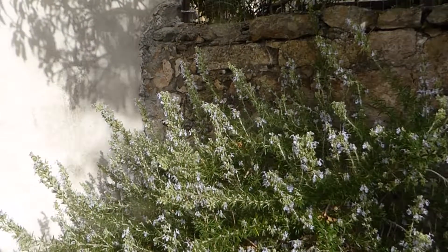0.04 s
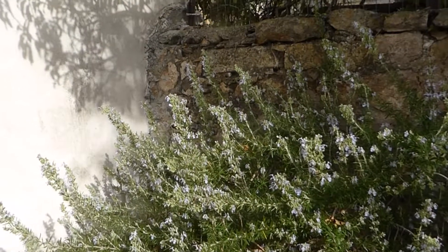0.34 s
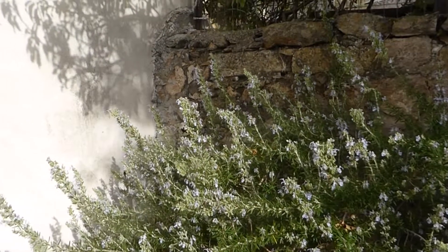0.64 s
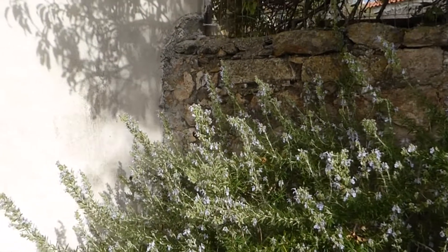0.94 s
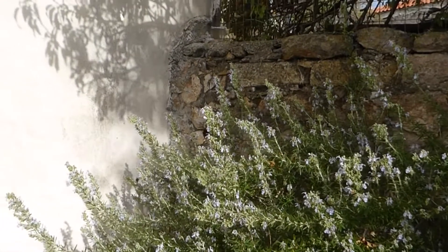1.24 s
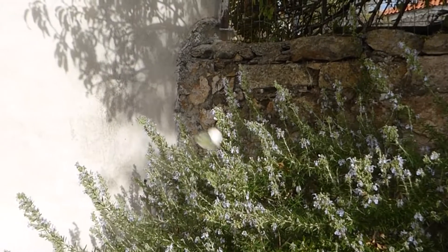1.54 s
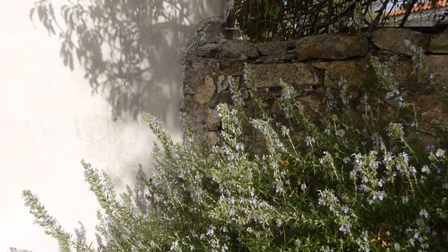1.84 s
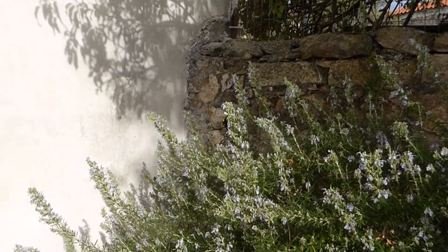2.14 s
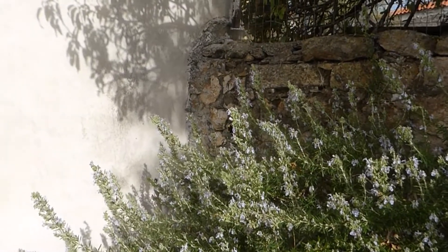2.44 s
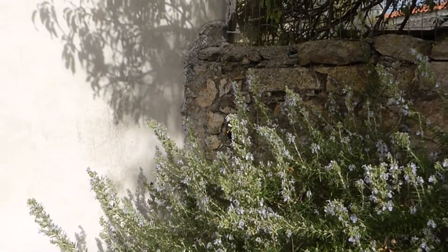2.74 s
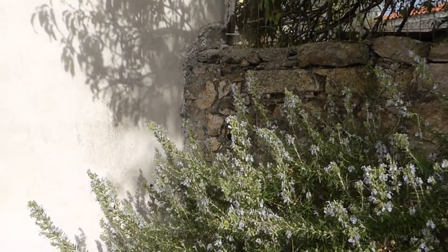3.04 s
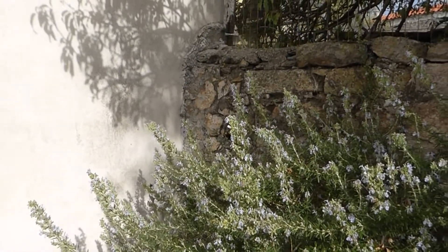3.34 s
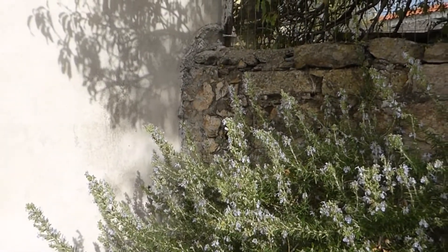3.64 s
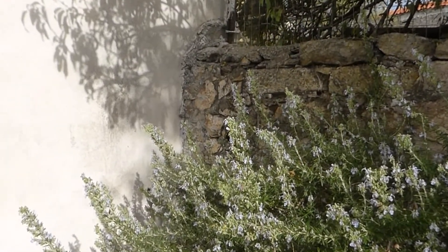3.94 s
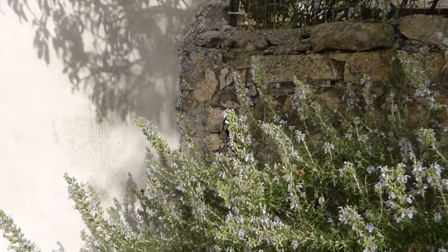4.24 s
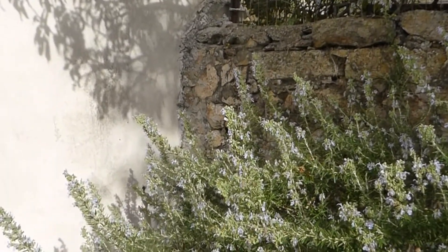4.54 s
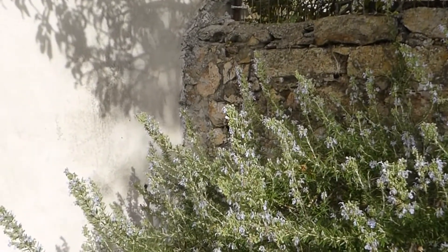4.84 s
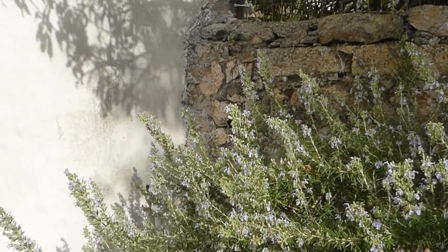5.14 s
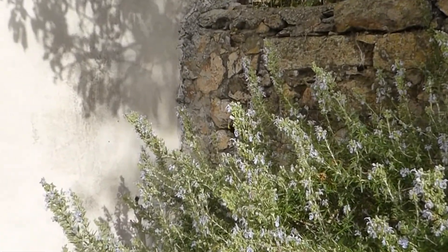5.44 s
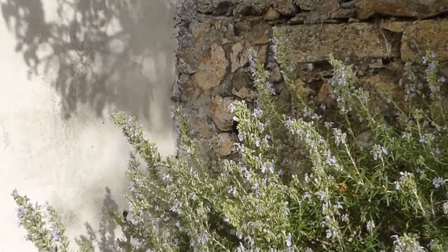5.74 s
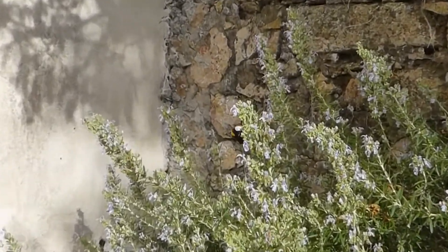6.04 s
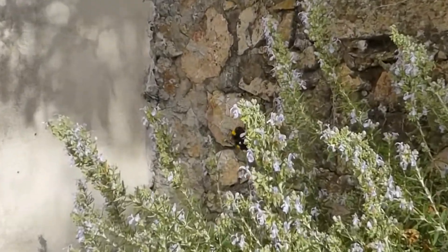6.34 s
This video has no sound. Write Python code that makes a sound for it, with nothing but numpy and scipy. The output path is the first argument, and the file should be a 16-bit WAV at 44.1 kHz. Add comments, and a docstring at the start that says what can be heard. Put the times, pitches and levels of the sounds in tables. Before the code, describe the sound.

Close to a bush in a quiet garden, several bees buzz with a wavering pitch above a swarm, soft hiss and low rumble. A distant bird whistles faintly a few times. Taps and rubs on the camera come in right beside the microphone, followed by a high, gritty zoom whirr and a single sharp snap of the housing. After a short pause the zoom whirrs again as the hand lightly bumps the body.

```python
"""A garden, at a flowering bush by a stone wall: honeybees hum on wavering wingbeats, three close by
and a swarm behind, over soft air, rumble, hiss and a few faint bird whistles.
Fingers tick, rub and bump on a hand-held camera with two microphone ports. Its zoom motor whirrs twice,
the gears shaking the lens barrel, and the first run is broken by one sharp snap of the housing."""
import sys
import numpy as np
from scipy import signal
from scipy.fft import rfft, irfft, next_fast_len
from scipy.io import wavfile

SR = 44100
rng = np.random.default_rng(int(sys.argv[2]) if len(sys.argv) > 2 else 0)


def wav_out(sig):
    """Save sig, one row per channel (or a flat mono array), as 16-bit PCM at SR to the path in sys.argv[1]."""
    wavfile.write(sys.argv[1], SR, np.round(np.clip(np.atleast_2d(sig).T, -1, 1) * 32767).astype(np.int16))


N = 282681
TIME = np.arange(N) / SR


# flight paths of the nearest, a side-on and a heavier bee: t/s, wingbeat f/Hz, relative level/dB
NEAR_PATH = [(0.0, 225.8, -65), (0.15, 236.2, -68), (0.4, 243, -72), (0.7, 232.8, -61.5),
             (0.96, 237.6, -68), (1.08, 227.5, -59.5), (1.42, 216.1, -62.5), (1.72, 228.6, -59),
             (1.85, 224.2, -60), (2.0, 226, -61), (2.22, 229, -61.5), (2.55, 223.4, -61),
             (2.75, 212.7, -58), (2.95, 209.2, -58.5), (3.14, 215.2, -55.5), (3.38, 224.2, -61),
             (3.52, 211.3, -60.5), (3.7, 222, -60), (3.92, 213.5, -58), (4.13, 215, -57.5),
             (4.3, 214.6, -66), (4.5, 218.2, -62), (4.9, 224.2, -64.5), (5.57, 231, -62.5),
             (5.85, 214.2, -68), (6.08, 222, -59), (6.32, 233, -61), (6.41, 224.5, -67)]
SIDE_PATH = [(0.0, 223.4, -78), (0.3, 223.7, -73), (0.5, 214.6, -62.5), (0.7, 228, -66), (0.9, 222.9, -69),
             (1.15, 213.9, -65), (1.5, 219.1, -67), (1.85, 226.1, -58), (2.1, 222.3, -76),
             (2.33, 226.4, -56), (2.55, 214.8, -70), (3.3, 214.5, -69), (4.6, 212, -69), (6.41, 218.2, -73)]
HEAVY_PATH = [(0.0, 185, -73.5), (0.4, 190, -77), (0.8, 189.2, -73), (1.1, 184, -69), (1.3, 188, -69),
              (1.58, 195, -67), (1.9, 194, -67.5), (2.3, 188, -72), (3.2, 198, -77), (6.41, 190, -90)]
# their wing timbres, the first shared with the swarm: f/Hz, harmonic level/dB
WING_TONE = [(200, -7), (450, -1.5), (680, -10.5), (900, -17.5), (1150, -13), (1400, -10.5), (2000, -31),
             (3500, -14)]
SIDE_TONE = [(220, -12), (440, -7), (660, -3), (880, -12), (1350, -18)]
HEAVY_TONE = [(190, -4.5), (380, 2), (580, -10)]
def close_bees():
    """Three bees stand out of the swarm, weaving in pitch."""
    return (flight(NEAR_PATH, WING_TONE, gain_db=-6, turning_db=1, lag_s=0.00009, harmonics=8)
            + flight(SIDE_PATH, SIDE_TONE, gain_db=-6, turning_db=2.5, lag_s=0.00015, harmonics=6)
            + flight(HEAVY_PATH, HEAVY_TONE, gain_db=-2, turning_db=2.5, lag_s=-0.00021, harmonics=3))


def flight(path, tone, gain_db, turning_db, lag_s, harmonics):
    """One bee among the flowers: its wingbeat trembles, and it swells and fades as it turns."""
    wing_hz, level_db = in_time(path)
    tremble = 1 + .008 * drift(14) + .018 * drift(60)
    level = from_db(level_db + gain_db + turning_db * drift(2.6))
    return level * wingbeat(wing_hz * tremble, tone, lag_s, harmonics, flutter_db=3)


def wingbeat(wing_hz, tone, lag_s, harmonics, flutter_db):
    """Beating wings: each harmonic flutters on its own, and the buzz reaches one port first."""
    mean_hz, out = wing_hz.mean(), np.zeros((2, N), np.float32)
    port_phase = np.pi * mean_hz * lag_s * np.array([[1], [-1]])
    phase = (phase_of(wing_hz) + port_phase).astype(np.float32)
    for k in range(1, harmonics + 1):
        level = from_db(at_hz(tone, k * mean_hz) + flutter_db * drift(7.8)).astype(np.float32)
        out += level * np.sin(k * phase + np.float32(rng.uniform(0, 2 * np.pi)))
    return np.sqrt(2) * out


def swarm(wander=.03, tremble=0.012, presence_db=4, slow_hz=204, fast_hz=242, bees=7):
    """Other bees come and go, each on an unsteady wingbeat of its own."""
    out = 0
    for k, hz in enumerate(np.linspace(slow_hz, fast_hz, bees)):
        wing_hz = hz * (1 + wander * drift(1.8) + tremble * drift(15.3))
        presence = from_db(presence_db * np.minimum(drift(2.8), 1))
        lag_s = 0.00052 * np.cos(2 * k)
        out = out + presence * wingbeat(wing_hz, WING_TONE, lag_s, harmonics=7, flutter_db=1.5)
    return rms_one(out)


# envelopes of the two zoom runs: t/s, level/dB
FIRST_ZOOM = [(3.52, -62), (3.58, -54.5), (3.66, -52.5), (3.85, -51.5), (4.14, -51), (4.21, -62),
              (4.335, -53.5)]
SECOND_ZOOM = [(5.306, -52), (5.335, -44.5), (5.37, -49), (5.40, -51.5), (5.8, -52), (6.1, -53),
               (6.41, -54)]
# lens barrel resonances: f/Hz, width/Hz, relative level/dB, relative throb/dB, pan/dB, racing gain/dB
BARREL_MODES = [(908, 88, -11, -2, -10.5, -2), (1320, 150, -22, -8, -7, 0), (1545, 470, 2, 4, -2, 1),
                (2730, 310, -8, 1.5, 0, 4), (3240, 540, -1, 0, -2, -4), (3660, 340, 0.5, 0, -3, -10),
                (3930, 480, 1, -1, 1, -7), (4550, 427, -2, 7, 1, 1), (5540, 563, -2, 5, 0, 4),
                (6624, 1250, -4, 4.5, -2.5, 2.5), (9600, 2500, -3.5, 1, 1, 0.5),
                (11100, 1715, -1, 3.5, -2, -2), (13200, 1100, -20, 8, -1, 0), (14000, 600, -13, 3, 0, -1)]
def zoom(run, throb, tooth_db, teeth=6):
    """The gears rub hardest once a turn and tick on every tooth, shaking the lens barrel."""
    gate = during(run, fade_s=0.0019)
    on, whirr, out = gate > 0, 0, np.zeros((2, N))
    level_db, = in_time(run)
    angle = gear_angle()[on]
    rub = np.tanh(2 * (np.cos(angle) - .3)) / 2
    ticking = from_db(tooth_db * np.cos(teeth * angle))
    speed, = in_time(GEAR_RATE)
    racing = ((speed - speed.min()) / np.ptp(speed))[on]
    for hz, width_hz, mode_db, throb_db, pan_db, race_db in BARREL_MODES:
        white = rng.standard_normal((2, 2 * SR))[:, :len(angle)]
        grit = ports(*white, at_hz(PORT_LIKENESS, hz))
        force = grit * ticking * from_db(throb * throb_db * rub)
        resonance = rms_one(band(force, hz, width_hz))
        whirr = whirr + from_db(mode_db + race_db * racing) * pan(pan_db) * resonance
    out[:, on] = rms_one(whirr) * gate[on] * from_db(level_db[on])
    return out


# gear speed, racing briefly as the second run starts: t/s, turning rate/Hz
GEAR_RATE = [(4.34, 36.1), (5.30, 36.4), (5.31, 58), (5.37, 54), (5.40, 36.4)]
def gear_angle(throb_peak_s=5.609):
    """Angle of the gear, zero where it rubs hardest."""
    angle = phase_of(in_time(GEAR_RATE)[0])
    return angle - np.interp(throb_peak_s, TIME, angle)


# singing gears: t/s, length/s, fade/s, f/Hz, level/dB, throb/dB, pitch roughness/fraction
GEAR_NOTES = [(1.665, 0.044, .015, 3540, -72, 0, .005), (2.03, 0.065, .015, 3530, -70, 0, 0.0051),
              (3.826, .15, .02, 3660, -63.5, 4, 0.0082), (3.98, 0.2, 0.025, 3612, -62, 1, 0.0057),
              (4.19, .145, .02, 3680, -71, 0, 0.0099), (4.178, 0.014, .002, 5920, -46, -3, .005),
              (4.305, 0.016, 0.0071, 4900, -52.5, 0, .015), (5.39, 1.05, 0.047, 3600, -61, 5.5, 0.0132),
              (5.34, 1.076, .05, 5548, -66, 5.5, 0.0138)]
def gear_whine(flicker_db=2, pan_db=-5):
    """The lens gears sing now and then in wavering tones, some throbbing once a turn."""
    out = np.zeros(N)
    waver = drift(170) + .4 * drift(20)
    throb = np.cos(gear_angle())
    for start, length, fade, hz, db, throb_db, rough in GEAR_NOTES:
        gate = np.clip(np.minimum(TIME - start, start + length - TIME) / fade, 0, 1)
        on = gate > 0
        tone = np.sin(phase_of(hz * (1 + rough * waver[on])))
        out[on] += from_db(db + throb_db * throb[on]) * gate[on] * tone
    return np.sqrt(2) * out * from_db(flicker_db * drift(74)) * pan(pan_db)


# the motor's high whine in each run: t/s, f/Hz, level/dB
FIRST_WHINE = [(3.6, 4780, -73), (3.67, 4835, -64), (3.75, 4770, -71), (3.81, 4727, -66), (3.9, 4730, -76),
               (3.95, 4820, -67), (4.02, 4820, -64), (4.06, 4744, -73), (4.1, 4750, -63.5),
               (4.16, 4867, -66)]
SECOND_WHINE = [(5.85, 4800, -73), (6.05, 4800, -68), (6.114, 4810, -61), (6.16, 4670, -61),
                (6.264, 4870, -58), (6.33, 4790, -62), (6.41, 4760, -61)]
def motor_whine(path, rough, flicker_db=3.5, pan_db=-2):
    """A thin tone that sags and recovers with the load on the motor."""
    hz, level_db = in_time(path)
    tone = np.sqrt(2) * np.sin(phase_of(hz * (1 + rough * drift(168))))
    return tone * during(path, fade_s=.01) * from_db(level_db + flicker_db * drift(60)) * pan(pan_db)


# catches of the lens drive: t/s, level/dB
LENS_CATCHES = [(3.717, -49), (4.689, -53.5), (5.312, -47)]
def lens_ticks(hz=3570, width_hz=500, half_length_s=0.0052, pan_db=-2,
               creep_start_s=5.092, step_s=0.0256, creep_db=-61, steps=9):
    """The drive catches, and creeps before the second run: each tick is a short rasp in the barrel."""
    creep = [(creep_start_s + k * step_s, creep_db) for k in range(steps)]
    force = sum(from_db(db) * np.exp(-np.minimum(((TIME - s) / half_length_s) ** 2, 50))
                for s, db in LENS_CATCHES + creep)
    grit = ports(*rng.standard_normal((2, N)), at_hz(PORT_LIKENESS, hz))
    return force * rms_one(band(grit, hz, width_hz)) * pan(pan_db)


# slips of a straining catch: t/s, level/dB, attack/s, decay/s
SNAP_SLIPS = [(4.160, -33, .0005, .001), (4.162, -21.5, 0.0003, 0.0005), (4.1698, -20, 0.0004, 0.0007),
              (4.1713, -10, 0.0002, 0.0005), (4.1721, -10.5, 0.0003, 0.0008), (4.171, -31, 0.007, 0.005)]
# colour of the crack: f/Hz, level/dB
CRACK_COLOUR = [(30, -20), (80, -26), (300, -11.5), (550, -11), (900, -6.5), (1400, -3.5), (2100, -10),
                (3500, -7), (5000, 7), (6400, 3.5), (8500, 1), (10500, 2), (11700, -4), (15000, -4.5),
                (16500, -15)]
# ring of the housing: f/Hz, level/dB, t60/s
HOUSING_MODES = [(220, -43, 0.025), (420, -40, 0.018), (740, -34, 0.025), (1320, -23, 0.018),
                 (1765, -20, 0.038), (2700, -26, 0.02), (3210, -22, 0.028), (3740, -21, 0.036),
                 (4010, -24, 0.045), (4890, -13.5, 0.014), (5590, -22, .018), (6080, -15, 0.012),
                 (6400, -17, 0.012), (7135, -19, 0.018), (7700, -25, 0.02), (8235, -25, .02),
                 (10440, -17, 0.008)]
# stereo image of the snap: f/Hz, pan/dB
SNAP_BALANCE = [(500, -1), (1760, -1), (2700, -7), (3210, 6), (3730, 5), (4300, -8), (4900, -1),
                (6400, -11), (8500, -8), (9500, -3), (12500, 3), (15000, -6)]
def snap(release_s=4.1712, rise_s=0.0011, left_lag_s=0.000295):
    """A catch slips hard and lets go; the housing rings, its treble mostly at the right port."""
    on, out = abs(TIME - release_s) < .1, np.zeros((2, N))
    t = TIME[on]
    force = sum(from_db(db) * np.exp(-np.maximum((s - t) / attack, (t - s) / decay))
                for s, db, attack, decay in SNAP_SLIPS)
    grit = noise(CRACK_COLOUR)
    grit[0] = np.interp(TIME - left_lag_s, TIME, grit[0])
    age = np.maximum(t - release_s, 0)
    port_phase = np.array([[np.pi / 2], [0]])   # the ring is a quarter cycle late on the left
    ring = sum((-1) ** k * from_db(db - 60 * age / t60) * np.sin(2 * np.pi * hz * age - port_phase)
               for k, (hz, db, t60) in enumerate(HOUSING_MODES))
    spectrum = rfft(force * grit[:, on] + (1 - np.exp(-age / rise_s)) * ring)
    pan_db = at_hz(SNAP_BALANCE, np.arange(spectrum.shape[1]) * SR / len(t))
    out[:, on] = irfft(spectrum * from_db(np.array([pan_db, -pan_db]) / 2), len(t))
    return out


# finger taps on the casing: t/s, scratch level/dB, thud level/dB, hold/s
FINGER_TAPS = [(2.825, -48.5, -46, 0.0021), (2.906, -52, -72, 0.0037), (3.019, -44, -50, 0.0028),
               (3.2017, -43.5, -42, 0.0029), (3.398, -51, -43, .0024), (3.415, -53.5, -43.5, 0.0019),
               (3.818, -46.5, -67, 0.0017), (4.4697, -70, -45, .0008), (4.547, -54.5, -56, .005),
               (4.589, -71, -45.5, .0012), (4.688, -51, -67, .003), (4.772, -45, -50, 0.0034),
               (5.7975, -44, -69, .003)]
# finger rubs and, at 4.173 s, the short, dull rattle that trails the snap: t/s, hold/s, scratch level/dB
RUBS_AND_RATTLE = [(1.426, 0.0091, -59.5), (2.837, 0.02, -55.5), (3.055, 0.014, -48), (3.209, 0.01, -55),
                   (3.417, 0.071, -58.5), (4.173, 0.015, -41), (4.533, 0.0062, -56.5),
                   (4.706, 0.032, -56.5), (4.779, 0.079, -55)]
# colours of the scratch and the thud: f/Hz, level/dB
SCRATCH_COLOUR = [(200, -28), (900, -17), (1600, 3), (2300, -10.5), (3500, 2.5), (5000, -0.5), (6400, -2),
                  (8500, -7), (10400, 1.5), (12000, -14), (15000, -25), (16000, -40)]
THUD_COLOUR = [(30, -44), (70, -38), (140, -1), (300, 4.5), (700, -0.5), (1000, -9), (1600, -1),
               (3000, -30)]
def casing(attack_s=0.00011, tap_decay_s=0.0026, rasp_decay_s=0.0051, rasp_thud_db=-5, grain_db=3.5):
    """Finger taps, rubs and the rattle that trails the snap: each a grainy scratch over a dull thud."""
    scratch, thud = np.zeros(N), np.zeros(N)
    taps = [(*tap, tap_decay_s) for tap in FINGER_TAPS]
    rasps = [(s, db, db + rasp_thud_db, hold, rasp_decay_s) for s, hold, db in RUBS_AND_RATTLE]
    for start, scratch_db, thud_db, hold, decay in taps + rasps:
        first = int(start * SR)
        t = TIME[:min(SR // 4, N - first)]
        envelope = np.minimum(t / attack_s, 1) * np.exp(-np.maximum(t - hold, 0) / decay)
        scratch[first:first + len(t)] += from_db(scratch_db) * envelope
        thud[first:first + len(t)] += from_db(thud_db) * envelope
    # a 115 Hz high-pass keeps the thuds light and free of boom
    low_cut = signal.butter(3, 115, "high", fs=SR, output="sos")
    thuds = signal.sosfilt(low_cut, (thud + 1e-12) * noise(THUD_COLOUR))
    return scratch * noise(SCRATCH_COLOUR) * from_db(grain_db * drift(210)) + thuds


# the firmest pushes on the camera body: t/s, f/Hz, relative level/dB
BODY_BUMPS = [(5.345, 163.3, -49), (5.369, 129.5, -52), (5.764, 176, -50.5), (6.01, 173.2, -44),
              (6.125, 180, -47), (6.349, 184.6, -50)]
def bumps(swell_s=0.0073, gain_db=-3.5):
    """The hand bumps the body: a few low cycles that swell and die."""
    out = np.zeros(N)
    for start, hz, db in BODY_BUMPS:
        t = np.maximum(TIME - start, 0)
        envelope = t / swell_s * np.exp(1 - t / swell_s)
        out += from_db(db + gain_db) * envelope * np.sin(2 * np.pi * hz * t)
    return out


# shifts of the grip: centre t/s, half length/s, level/dB
GRIP_SHIFTS = [(1.301, 0.28, -75), (3.05, 0.3, -67), (4.003, 0.22, -68), (4.743, .13, -64.5),
               (5.557, 0.34, -66), (6.25, 0.32, -62.5)]
# colour of the low rumble, shared with the garden: f/Hz, level/dB
RUMBLE_COLOUR = [(20, -23), (50, -18), (80, -8), (120, 0), (170, 2.5), (260, -0.5), (500, -42)]
def grip(lumpy_db=1.5):
    """Each shift of the hand is a lumpy rumble that swells and fades."""
    pressure = sum(from_db(db) * np.exp(-((TIME - s) / half) ** 2) for s, half, db in GRIP_SHIFTS)
    return pressure * from_db(lumpy_db * drift(14)) * noise(RUMBLE_COLOUR)


# fader ride of the garden bed: t/s, level/dB
GARDEN_LEVEL = [(0.0, -65.5), (0.43, -64), (0.73, -62.5), (2.16, -57.5), (3.34, -58.5), (4.0, -58.5),
                (4.21, -62), (4.75, -58.5), (5.84, -60), (6.41, -57.5)]
# colours of the air and the hiss: f/Hz, level/dB
AIR_COLOUR = [(40, -24), (90, -20), (170, -5), (310, 0), (500, -2.5), (700, -0.5), (950, -3.5),
              (1300, -4.5), (2000, -14), (4000, -38), (15000, -35), (16000, -58)]
HISS_COLOUR = [(900, -16), (1700, 2.5), (2600, 1), (3300, 0.5), (3550, 3), (3800, 2), (4750, 2.5),
               (5300, -5), (6400, -1.5), (8000, -5.5), (10200, 2.5), (11700, -3), (14300, -14),
               (15200, -35)]
# narrow resonances in the hiss: f/Hz, width/Hz, relative level/dB
HISS_BANDS = [(3536, 87, -18), (4530, 110, -18.5), (4813, 100, -21)]
def garden(swarm_db=-3.5, rumble_db=-14, hiss_db=-3.5):
    """The swarm, moving air, a far rumble and hiss rise and fall together as one bed."""
    bed = from_db(swarm_db) * swarm() + noise(AIR_COLOUR)
    bed += from_db(rumble_db) * noise(RUMBLE_COLOUR) + from_db(hiss_db) * noise(HISS_COLOUR)
    for hz, width_hz, db in HISS_BANDS:
        bed += from_db(db) * rms_one(band(rng.standard_normal((2, N)), hz, width_hz))
    return from_db(in_time(GARDEN_LEVEL)[0]) * bed


# distant calls: t/s, length/s, start f/Hz, end f/Hz, relative level/dB
BIRD_CALLS = [(.49, .08, 6790, 6500, -71), (.62, 0.075, 6620, 6400, -71), (2.2, 0.076, 6690, 6536, -78),
              (2.77, .17, 7696, 7220, -67), (5.839, 0.16, 7920, 7400, -70)]
def bird(blur=0.0316, gain_db=-1):
    """Thin falling whistles; a fast pitch wobble gives the blur of distance."""
    out, wobble = np.zeros(N), 1 + blur * drift(200)
    for start, length, start_hz, end_hz, db in BIRD_CALLS:
        on = (TIME > start) & (TIME < start + length)
        progress = (TIME[on] - start) / length
        hz = (start_hz + (end_hz - start_hz) * progress) * wobble[on]
        out[on] += from_db(db + gain_db) * np.sin(np.pi * progress) * np.sin(phase_of(hz))
    return np.sqrt(2) * out


# likeness of the two microphone ports: f/Hz, correlation
PORT_LIKENESS = [(30, 0.63), (150, 0.68), (450, 0.65), (800, -0.15), (1200, -0.45), (2000, -0.15),
                 (3500, 0.24), (5500, 0.27), (8000, 0.59), (15000, 0.5)]
def noise(colour):
    """Stereo noise of a given colour, rms 1."""
    size = next_fast_len(N)
    white = rfft(rng.standard_normal((2, size)))
    hz = np.arange(white.shape[1]) * SR / size
    spectrum = ports(*white, at_hz(PORT_LIKENESS, hz)) * from_db(at_hz(colour, hz))
    return rms_one(irfft(spectrum, size)[:, :N])


def ports(mid, side, correlation):
    """Two unrelated signals mixed into a left and right with the given correlation."""
    alike = np.clip(correlation, -.99, .99)
    return np.sqrt(1 + alike) * mid + np.sqrt(1 - alike) * side * np.array([[1], [-1]])


def pan(db):
    """Stereo gains for a left-minus-right level difference."""
    return from_db(np.array([[db], [-db]]) / 2)


def band(x, hz, width_hz):
    """A resonance with steep skirts."""
    edges = np.clip([hz - width_hz / 2, hz + width_hz / 2], 20, SR / 2 - 100)
    return signal.sosfilt(signal.butter(2, edges, "band", fs=SR, output="sos"), x)


def drift(rate_hz, step=40, settle=2000):
    """Smooth random wander of spread 1."""
    pole = np.exp(-2 * np.pi * rate_hz * step / SR)
    white = rng.standard_normal(N // step + settle + 2)
    slow = rms_one(signal.lfilter([1], [1, -2 * pole, pole * pole], white)[settle:])
    return np.interp(np.arange(N) / step, np.arange(len(slow)), slow)


def in_time(rows):
    """Each column of a curve at every sample."""
    times, *columns = np.transpose(rows)
    return [np.interp(TIME, times, column) for column in columns]


def at_hz(points, hz):
    """Read a spectrum on a log-frequency axis."""
    f, value = np.transpose(points)
    return np.interp(np.log(np.maximum(hz, 1)), np.log(f), value)


def during(rows, fade_s):
    """A gate, open between the first and last row of a curve."""
    return np.clip((TIME - rows[0][0]) / fade_s, 0, 1) * np.clip((rows[-1][0] - TIME) / fade_s + 1, 0, 1)


def phase_of(hz):
    """Phase in radians of a moving frequency."""
    return 2 * np.pi * np.cumsum(hz) / SR


def from_db(db):
    """Decibels to gain."""
    return np.exp(np.asarray(db) * (np.log(10) / 20))


def rms_one(x):
    """Scale to unit power."""
    return x / np.sqrt(np.mean(x ** 2) + 1e-20)


def scene():
    """Bees in the garden, with the camera's own noises on top."""
    whirr = zoom(FIRST_ZOOM, throb=1.8, tooth_db=3.2) + zoom(SECOND_ZOOM, throb=1.9, tooth_db=3)
    whine = gear_whine() + motor_whine(FIRST_WHINE, rough=.005) + motor_whine(SECOND_WHINE, rough=.014)
    handling = casing() + grip() + bumps() + snap()
    return close_bees() + garden() + bird() + whirr + whine + lens_ticks() + handling


def record(dry, cutoff_hz=16500):
    """Peaks clip at full scale, then a steep low-pass cuts the top."""
    low_pass = signal.ellip(10, .1, 70, cutoff_hz, fs=SR, output="sos")
    return signal.sosfilt(low_pass, np.clip(dry, -1, 1))


dry = scene()
out = record(dry)
wav_out(out)
```